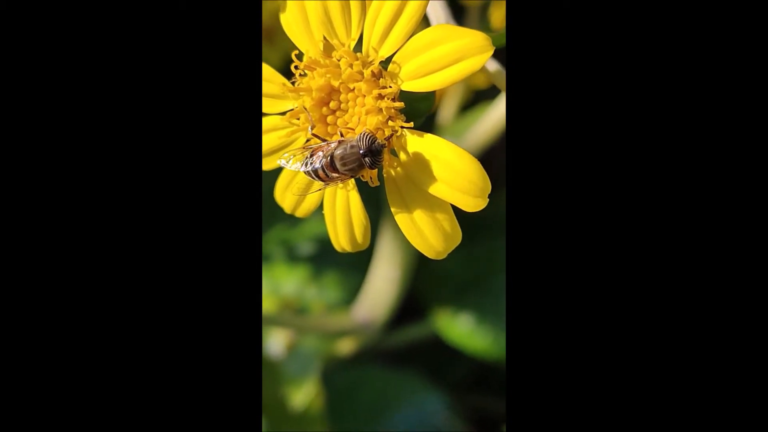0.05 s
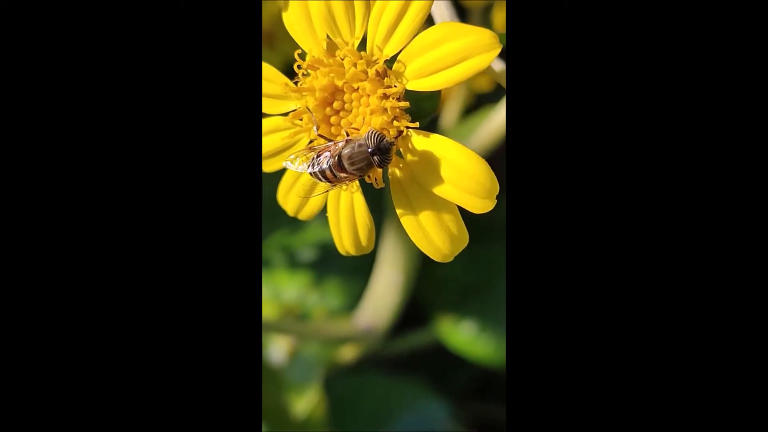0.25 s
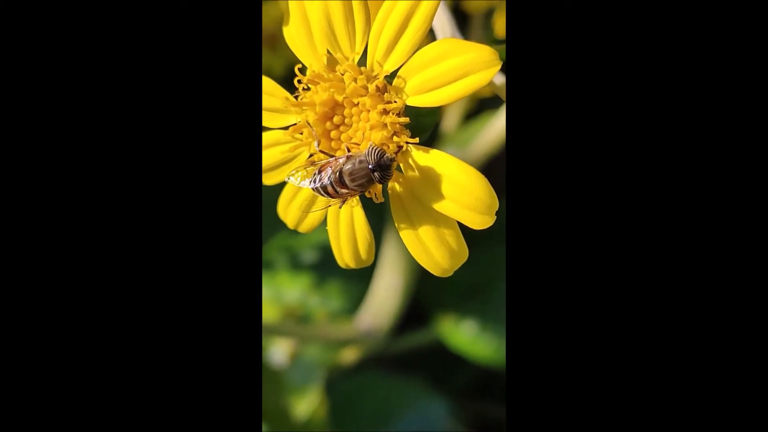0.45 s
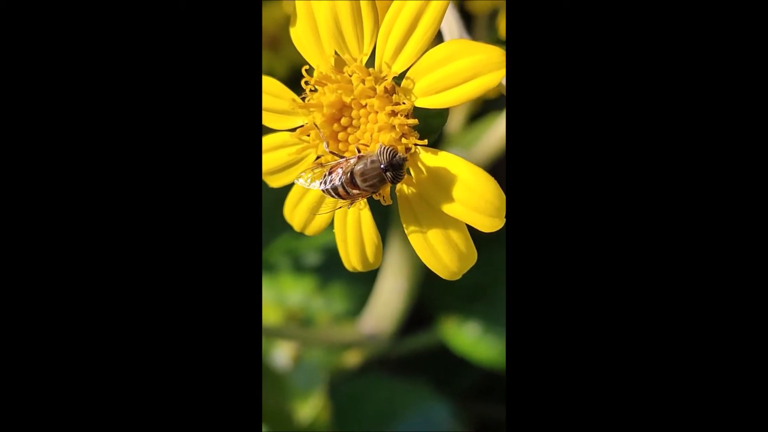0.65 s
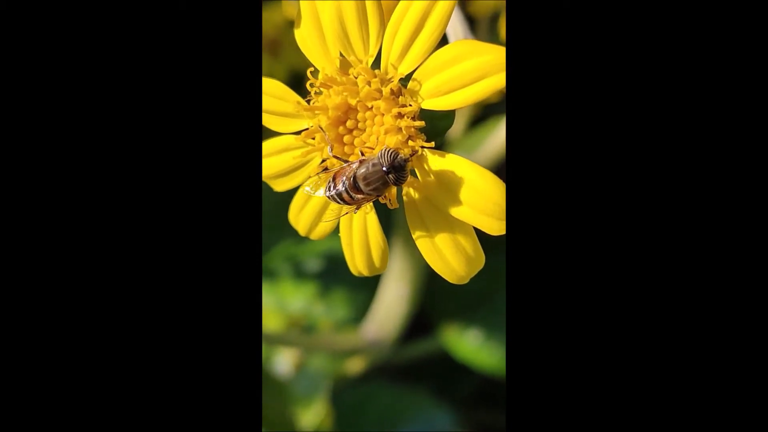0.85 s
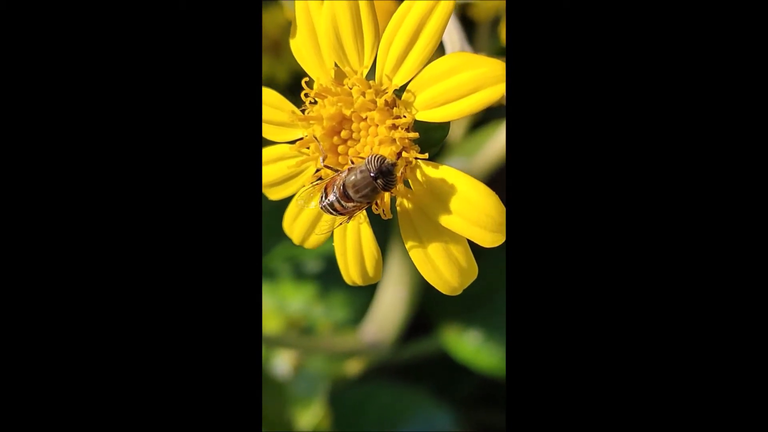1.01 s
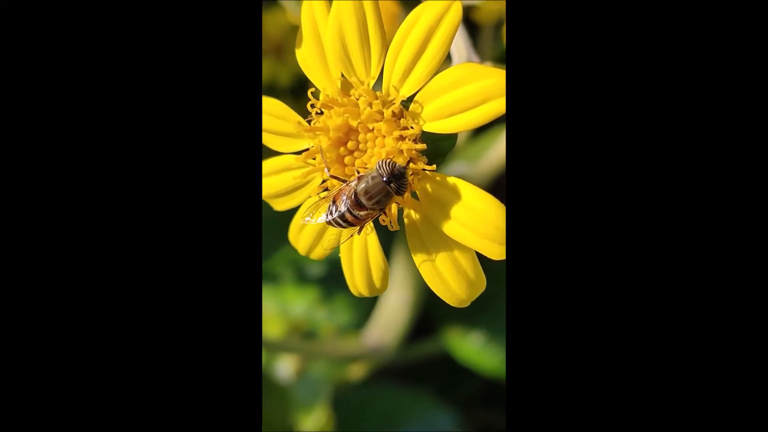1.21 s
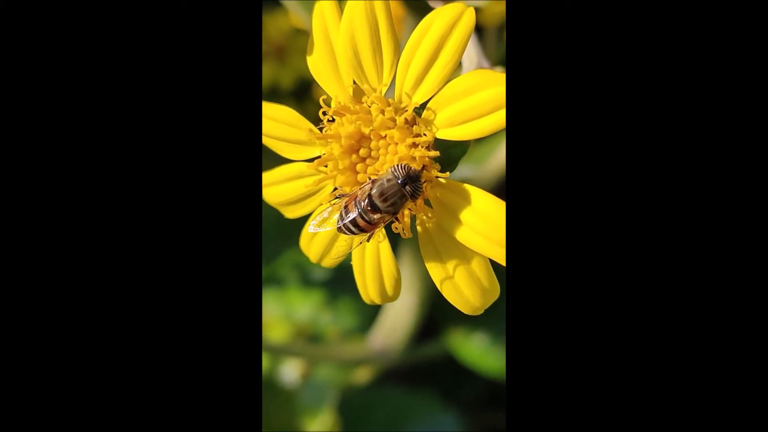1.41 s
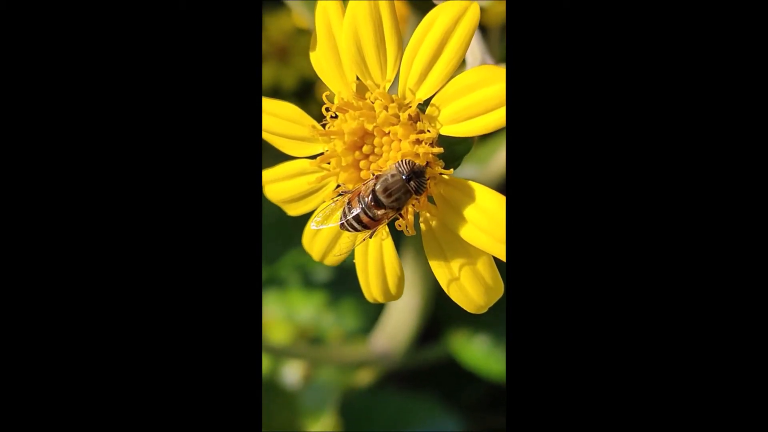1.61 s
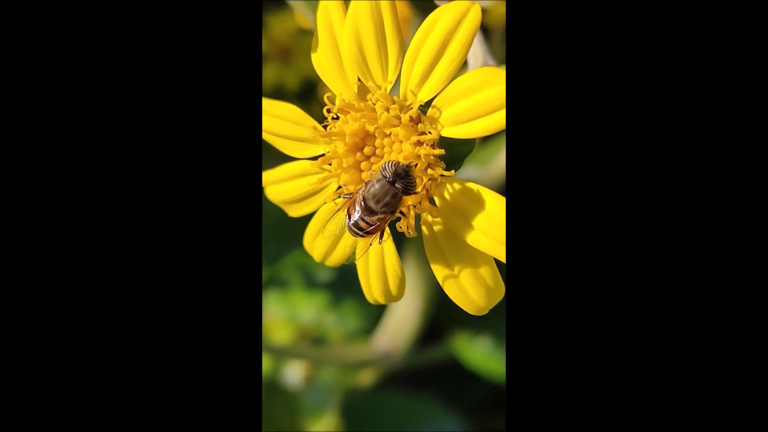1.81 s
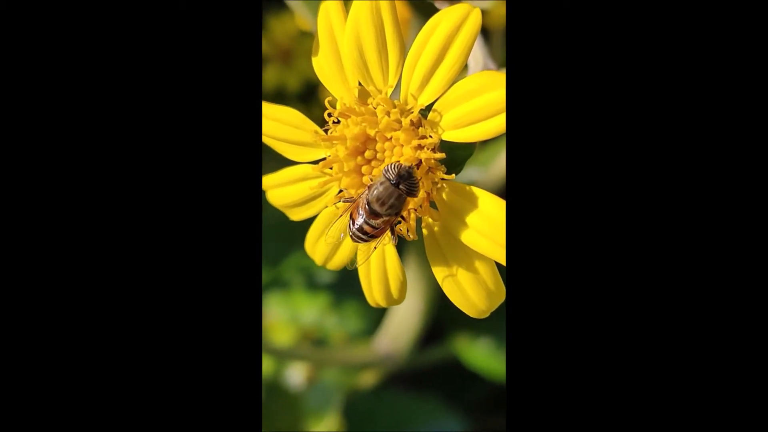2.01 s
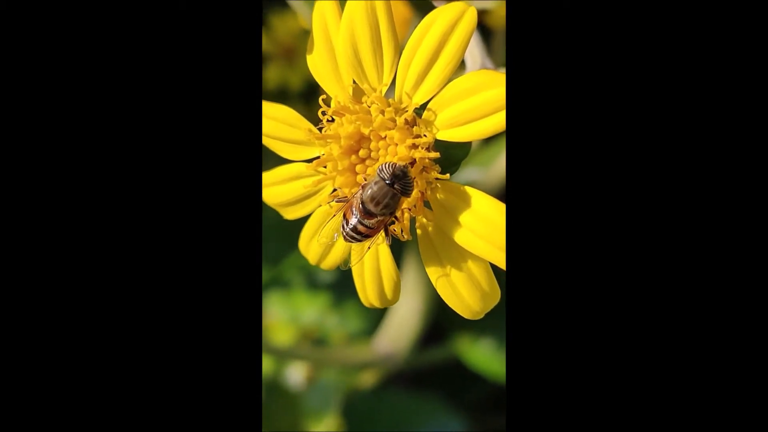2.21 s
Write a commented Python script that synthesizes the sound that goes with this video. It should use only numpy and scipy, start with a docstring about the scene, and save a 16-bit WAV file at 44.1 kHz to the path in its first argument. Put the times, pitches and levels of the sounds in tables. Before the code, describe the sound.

Close birdsong of high chirps and sliding whistles over a distant bird and quiet outdoor air.

```python
"""A small songbird close by sings a quick run of whistled chirps, slurs and warbles in a garden.
Each note is a nearly pure tone that slides in pitch, with weak overtones shaped by the bird's throat.
A farther bird flutes and warbles in a lower voice, one soft reedy note dips, and others call faintly.
Leaves and nearby surfaces scatter the song into a short tail, over a quiet outdoor background,
a low rustle and a little wind on the microphone."""
import sys
import numpy as np
from scipy import signal
from scipy.fft import rfft, irfft, next_fast_len
from scipy.io import wavfile

SR = 44100
rng = np.random.default_rng(int(sys.argv[2]) if len(sys.argv) > 2 else 0)


def file_out(sig):
    """Save sig as 16-bit WAV at sys.argv[1]."""
    # one column per channel
    cols = np.atleast_2d(sig).T
    # limit, then scale
    lim = np.clip(cols, -1, 1)
    pcm = np.round(lim * 32767).astype(np.int16)
    wavfile.write(sys.argv[1], SR, pcm)


N = 103635
TIME = np.arange(N) / SR


def from_db(db):
    """Turn decibels into a number to multiply by."""
    return 10 ** (np.asarray(db) / 20)


def rms_one(x):
    """Scale a sound so that its average power is 1."""
    return x / np.sqrt(np.mean(x ** 2) + 1e-20)


def over_time(points):
    """Join (seconds, value) points with straight lines, giving one value for every sample."""
    return np.interp(TIME, *np.transpose(points))


def gain_at(points, hz):
    """Read the gain at each frequency from a curve of (Hz, dB) points."""
    point_hz, db = np.transpose(points)
    return from_db(np.interp(np.log(hz + 1), np.log(point_hz), db))


def coloured(x, points):
    """Turn a sound's lows and highs up or down along a curve of (Hz, dB) points."""
    size = next_fast_len(2 * len(x))
    gain = gain_at(points, np.fft.rfftfreq(size, 1 / SR))
    return irfft(rfft(x, size) * gain, size)[:len(x)]


def drift(rate_hz):
    """A smooth random wander, about 1 in size; a higher rate wanders faster."""
    pole = np.exp(-2 * np.pi * rate_hz / SR)
    wander = signal.lfilter([1], [1, -2 * pole, pole * pole], rng.standard_normal(2 * N))
    return rms_one(wander[N:])


def glide(t, times, values):
    """A smooth curve through the points that never overshoots them."""
    step = np.maximum(np.diff(times), 1e-5)
    slope = np.diff(values) / step
    before, after = slope[:-1], slope[1:]
    tangent = np.r_[slope[0], 2 * np.maximum(before * after, 0) / (before + after + 1e-9), slope[-1]]
    i = np.clip(np.searchsorted(times, t) - 1, 0, len(step) - 1)
    u = np.clip((t - times[i]) / step[i], 0, 1)  # 0 at one point, 1 at the next
    bend = (1 - u) * (tangent[i] - slope[i]) - u * (tangent[i + 1] - slope[i])
    return values[i] + step[i] * u * (slope[i] + (1 - u) * bend)


# The tone of the outdoor air. Each row: frequency in Hz, relative level in dB.
AIR_COLOUR = [(30, 19.5), (165, 16.5), (270, 8), (500, 5.5), (1000, 0), (1700, -4), (5000, -3.5),
              (7300, -15), (15500, -23)]
def outdoor_air(level_db=-47):
    """A steady, far-off rumble and hiss."""
    return from_db(level_db) * rms_one(coloured(rng.standard_normal(N), AIR_COLOUR))


# How the rustle fades. Each row: time in seconds, level in dB.
RUSTLE_LEVELS = [(.3, -54.5), (1.0, -66.5)]
def rustle(band_hz=(200, 520)):
    """A low rustle, strongest at the start and then dying down."""
    band = signal.butter(2, band_hz, "band", fs=SR, output="sos")
    noise = rms_one(signal.sosfilt(band, rng.standard_normal(N)))
    return from_db(over_time(RUSTLE_LEVELS)) * noise


# How wide the background is. Each row: frequency in Hz, level of the sides against the centre in dB.
BACKGROUND_WIDTH = [(50, -31.5), (350, -13), (1200, -7.5), (5000, -23)]
def background():
    """Air and rustle spread between left and right, a little wider in the middle pitches."""
    centre = outdoor_air() + rustle()
    side = coloured(outdoor_air() + rustle(), BACKGROUND_WIDTH)
    return centre + side * [[1], [-1]]


# The rise and fall of the wind. Each row: time in seconds, level in dB.
WIND_LEVELS = [(.15, -47), (.21, -31.5), (.3, -40), (.8, -39.5), (.88, -33.5), (.98, -47), (1.15, -32.5),
               (1.55, -45), (2.08, -43.5), (2.2, -35.5)]
def wind(band_hz=(9, 37)):
    """Light puffs make a deep flutter on the microphone."""
    band = signal.butter(2, band_hz, "band", fs=SR, output="sos")
    flutter = rms_one(signal.sosfilt(band, rng.standard_normal(2 * N))[N:])
    return from_db(over_time(WIND_LEVELS)) * flutter


def syllable(points, attack_s=.0014, release_s=.0046):
    """One bird note: the samples where it sounds, its sliding pitch and its loudness."""
    times, hz, db = np.transpose(points)
    times = np.sort(times)
    fade_in = np.clip((TIME - times[0]) / attack_s + .5, 0, 1)
    fade_out = np.clip((times[-1] - TIME) / release_s + .5, 0, 1)
    fade = fade_in * fade_out
    live = np.flatnonzero(fade)
    gain = from_db(glide(TIME[live], times, db)) * np.sin(fade[live] * np.pi / 2) ** 2
    return live, glide(TIME[live], times, hz), gain


# The throat lets overtones through unevenly. Each row: frequency in Hz, boost or cut in dB.
THROAT_COLOUR = [(3500, -0.5), (5000, 12.5), (6500, 11.5), (7800, 0), (10000, -3), (12000, -4),
                 (15000, 3.5)]
# Overtones change in strength from note to note. Each row: time in seconds, boost or cut in dB.
OVERTONE_BRIGHTNESS = [(.12, -2), (.36, 6.5), (.42, -1), (.6, 3), (.66, -14), (.77, 1.5), (1.75, -1.5),
                       (1.81, -4.5), (2.04, 2.5)]
def sing(notes, overtones_db=(), warbles=()):
    """A bird's nearly pure whistle; overtones_db gives base levels at 2, 3, .. times its pitch."""
    waver = 1 + .003 * drift(450)
    shimmer_db = .5 * drift(70)
    flickers_db = [2.5 * drift(60) + over_time(OVERTONE_BRIGHTNESS) for _ in overtones_db]
    hiss = signal.lfilter([1, -1], [2], rng.standard_normal(N))
    warble_hz, warble_db = warble(warbles)
    out = np.zeros(N)
    for note in notes:
        live, pitch, gain = syllable(note)
        phase = 2 * np.pi * np.cumsum(pitch * waver[live] + warble_hz[live]) / SR
        sweep_hz_per_s = np.abs(np.diff(pitch, prepend=pitch[:1])) * SR
        rasp = from_db(-36) * np.tanh(sweep_hz_per_s / 40000) * hiss[live]  # strongest in fast slides
        tone = np.sin(phase) + rasp
        for k, (db, flicker_db) in enumerate(zip(overtones_db, flickers_db), 2):
            throat = gain_at(THROAT_COLOUR, k * pitch) * (k * pitch < SR / 2)
            tone += from_db(db + flicker_db[live]) * throat * np.sin(k * phase)
        out[live] += gain * from_db(shimmer_db[live] + warble_db[live]) * tone
    return out


def blurred(x, wander_radians=2, rate_hz=65):
    """A wandering phase smears each tone into a soft, pitch-blurred wash."""
    wander = np.exp(1j * wander_radians * drift(rate_hz))
    return np.real(signal.hilbert(x, next_fast_len(N))[:N] * wander)


# Calls from far away. Each row: start in seconds, length in seconds, first pitch in Hz,
# last pitch in Hz, level in dB before the garden scatters it.
DISTANT_CALLS = [(-.01, 0.02, 4780, 5000, -25), (0.225, 0.043, 5300, 4680, -38),
                 (1.767, .13, 2550, 2194, -42.5), (2.253, 0.031, 6620, 5660, -46)]
def distant_birds():
    """Faint short sliding whistles, blurred in pitch."""
    notes = [[(start, first_hz, db), (start + length, last_hz, db)]
             for start, length, first_hz, last_hz, db in DISTANT_CALLS]
    return blurred(sing(notes))


# Echoes from nearby surfaces. Each row: delay in seconds, level in dB.
NEAR_ECHOES = [(.0062, -28), (0.0126, -18.5)]
# The tone of the scattered sound. Each row: frequency in Hz, boost in dB.
SCATTER_TONE = [(2000, 7), (5000, 1.5), (7000, 3), (14000, 5)]
def garden(x, leaves_db=-14, leaves_s=.16, tail_db=-24, tail_s=.65):
    """What the garden sends back: two echoes, quick scatter from leaves and a faint, blurred tail."""
    t = TIME[:SR]
    out = sum(from_db(db) * np.interp(TIME - delay, TIME, x, left=0) for delay, db in NEAR_ECHOES)
    for sound, db, decay_s in ((x, leaves_db, leaves_s), (blurred(x), tail_db, tail_s)):
        fade = from_db(-60 * t / decay_s) * np.minimum(t / .006, 1)
        scatter = rms_one(rng.standard_normal(SR) * fade) / np.sqrt(SR)
        response = coloured(from_db(db) * scatter, SCATTER_TONE)
        out += signal.fftconvolve(sound, response)[:N]
    return out


# The close bird's song. Each row is one note, made of points: time in seconds, pitch in Hz, level in dB.
SONG_NOTES = [
    [(0.0195, 5200, -30), (0.0282, 4990, -29), (0.0405, 3230, -35.5), (0.0513, 4260, -26),
     (0.06, 4300, -52)],
    [(0.076, 4860, -31), (0.0805, 5180, -28.5), (0.0896, 4730, -23), (0.1015, 3217, -28.5),
     (0.1134, 4270, -21), (0.128, 4630, -38)],
    [(0.188, 5540, -36), (0.1917, 6480, -27.5), (0.198, 8200, -57)],
    [(0.254, 3450, -44), (0.267, 4200, -31.5)],
    [(0.26, 2595, -39.5), (0.2728, 3040, -30.5), (0.281, 3500, -56)],
    [(0.326, 5690, -40), (0.338, 5556, -27), (0.35, 5705, -22.5), (0.3545, 7300, -31.5)],
    [(0.3605, 5980, -24.5), (0.379, 5870, -17), (0.3905, 6170, -21)],
    [(0.394, 5886, -17.5), (0.412, 5910, -17), (0.425, 5886, -19.5)],
    [(0.4285, 5790, -16), (0.447, 5710, -17.5), (0.4555, 6210, -22)],
    [(0.459, 5790, -23), (0.474, 5530, -33)],
    [(0.536, 3740, -43), (0.5432, 3790, -26.5), (0.557, 4210, -22.5)],
    [(0.553, 2950, -38), (0.569, 3260, -29), (0.578, 5060, -20.5), (0.608, 4660, -19), (0.625, 2770, -32.5)],
    [(0.636, 2954, -39.5), (0.6601, 3500, -22.5), (0.6779, 3866, -21), (0.703, 3940, -38)],
    [(0.754, 4770, -21.5), (0.7588, 5860, -25), (0.763, 5496, -45)],
    [(0.766, 5050, -24), (0.7721, 4560, -24), (0.7864, 4500, -20.5), (0.792, 5390, -21), (0.794, 3980, -20)],
    [(0.804, 3510, -28), (0.8113, 4070, -21.5), (0.8269, 4970, -21), (0.829, 3900, -20)],
    [(0.887, 5400, -28.5), (0.8968, 5480, -18), (0.902, 5070, -21)],
    [(0.903, 4550, -33), (0.912, 6180, -15), (0.918, 7250, -32.5)],
    [(0.916, 5324, -21.5), (0.928, 5425, -15.5), (0.938, 5370, -30)],
    [(0.955, 3980, -38), (0.959, 5370, -17.5), (0.965, 7550, -35)],
    [(0.968, 5390, -44), (0.973, 5413, -13), (0.99, 4970, -27)],
    [(1.034, 2830, -39), (1.0381, 2850, -32), (1.052, 2330, -40)],
    [(1.159, 3280, -37), (1.1662, 3840, -24), (1.1753, 4580, -25.5), (1.1825, 2920, -28.5),
     (1.1963, 4135, -18.5), (1.206, 4470, -55.5)],
    [(1.251, 4630, -27.5), (1.256, 5715, -16.5), (1.264, 5520, -15), (1.276, 5490, -12), (1.305, 5665, -14),
     (1.34, 5684, -14.5), (1.368, 5538, -15.5), (1.383, 5385, -19), (1.391, 4870, -43)],
    [(1.462, 3480, -38), (1.47, 4140, -26.5)],
    [(1.477, 5160, -22), (1.4849, 4568, -18.5), (1.496, 4840, -41)],
    [(1.527, 5180, -25), (1.5423, 5415, -18.5), (1.549, 5470, -13)],
    [(1.55, 6490, -38.5), (1.554, 5485, -15.5), (1.563, 4880, -15.5), (1.591, 4154, -26),
     (1.596, 4770, -19.5), (1.601, 4900, -13), (1.605, 3535, -28.5), (1.615, 4560, -17.5),
     (1.624, 4817, -15.5), (1.64, 4860, -22.5)],
    [(1.702, 4210, -41), (1.7159, 4430, -24.5), (1.721, 5150, -35.5)],
    [(1.716, 2985, -37), (1.768, 3455, -20), (1.787, 4020, -19), (1.803, 4175, -17), (1.826, 4025, -19),
     (1.85, 3326, -22.5), (1.879, 2880, -37.5)],
    [(1.931, 3370, -31), (1.9431, 2890, -32.5), (1.9511, 2326, -46.5), (1.9554, 3380, -24),
     (1.9609, 4580, -21), (1.967, 4808, -21), (1.9965, 4742, -13.5), (2.002, 3780, -28)],
    [(2.005, 4880, -29), (2.011, 5200, -16.5), (2.018, 4980, -20.5), (2.022, 3840, -29)],
    [(2.028, 6570, -44), (2.032, 5280, -16), (2.037, 4250, -20), (2.047, 3950, -21.5), (2.075, 3523, -23),
     (2.089, 3470, -39)],
]
def songbird():
    """A quick run of high chirps, slurs and flicks, with two weak overtones."""
    return sing(list(SONG_NOTES) + flicks(), overtones_db=[-34.5, -33.5])


# Flicks that cut the first long whistle into five pieces.
# Each row: start in seconds, top pitch in Hz, starting level in dB.
SONG_FLICKS = [(0.356, 6840, -15), (0.391, 6200, -22), (0.4255, 6230, -18.5), (0.456, 6130, -22.5)]
def flicks(length_s=.0037, end_hz=3600, bend=.9, fade_db=12):
    """Notes for the songbird that plunge nearly an octave in an instant, fading as they fall."""
    progress = np.linspace(0, 1, 8)
    fall = progress ** bend
    return [np.c_[start + length_s * progress, hz + (end_hz - hz) * fall, db - fade_db * progress]
            for start, hz, db in SONG_FLICKS]


# The lower bird's tune. Each row is one note, made of points: time in seconds, pitch in Hz,
# level in dB before it is shared between left and right.
FLUTING_NOTES = [
    [(.615, 1857, -54), (.65, 2045, -47)],
    [(.785, 1838, -59.5), (.83, 1965, -43), (.9, 2034, -45.5), (1.045, 1978, -53.5)],
    [(1.055, 2184, -42), (1.135, 2129, -46.5)],
    [(1.218, 2260, -43), (1.24, 2423, -44.5), (1.368, 2383, -49)],
    [(1.42, 2066, -41.5), (1.497, 1979, -40), (1.59, 2084, -44), (1.62, 2020, -48)],
    [(1.89, 1915, -50.5), (1.95, 1882, -55), (1.99, 1456, -57.5)],
    [(2.135, 1857, -50), (2.18, 1936, -48.5), (2.235, 1890, -53), (2.28, 1310, -56)],
]
# Where that bird warbles. Each row: start in seconds, end in seconds, pitch swing each way in Hz.
FLUTING_WARBLES = [(0.91, 1.135, 75), (1.238, 1.38, 85.7), (1.892, 2.272, 51)]
def fluting_bird(left_lead_db=5, scatter_boost_db=1):
    """A farther bird flutes in a lower voice on the left; the garden scatters it to both sides."""
    voice = sing(FLUTING_NOTES, overtones_db=[-43.5], warbles=FLUTING_WARBLES)
    pan = from_db([[left_lead_db / 2], [-left_lead_db / 2]])
    scattered = np.array([garden(voice), garden(voice)])
    return pan * voice + from_db(scatter_boost_db) * scattered


def warble(stretches, rate_hz=56, depth_db=5.5):
    """A fast wobble in pitch and level: the voice gets louder each time its pitch dips."""
    pitch_hz, level_db = np.zeros((2, N))
    for start, end, depth_hz in stretches:
        fade = np.clip(np.minimum(TIME - start, end - TIME) * 2 * rate_hz, 0, 1)
        swing = np.sin(2 * np.pi * rate_hz * (TIME - start)) * fade
        pitch_hz -= depth_hz * swing
        level_db += depth_db * swing
    return pitch_hz, level_db


# The path of the reedy note. Each row: time in seconds, pitch in Hz, level in dB.
REEDY_POINTS = [(1.052, 2030, -49.5), (1.069, 1404, -54.5), (1.098, 2006, -44.5)]
def reedy_note():
    """One soft note dips and rises again; a strong overtone makes it reedy."""
    return sing([REEDY_POINTS], overtones_db=[0])


def scene():
    """Song and wind in the centre, the fluting bird to the left, the background around them."""
    near = songbird() + reedy_note()
    scattered = garden(near + distant_birds())  # the distant birds are heard only as echoes
    return near + scattered + fluting_bird() + wind() + background()


def record(dry, cutoff_hz=15900):
    """The very highest treble is cut off steeply."""
    return signal.sosfilt(signal.ellip(10, .1, 80, cutoff_hz, fs=SR, output="sos"), dry)


dry = scene()
out = record(dry)
file_out(out)
```